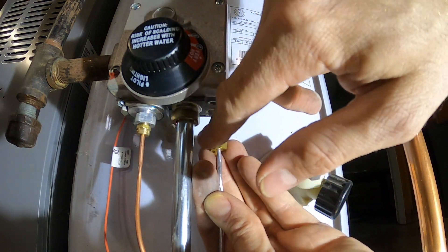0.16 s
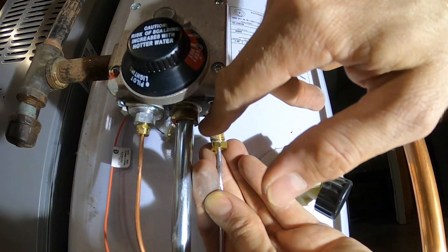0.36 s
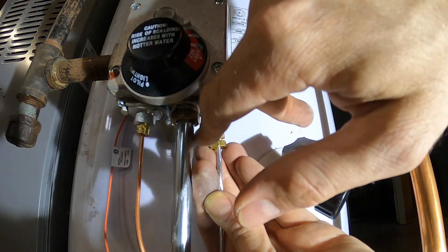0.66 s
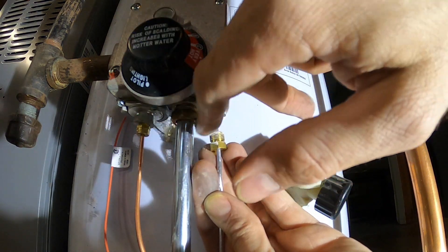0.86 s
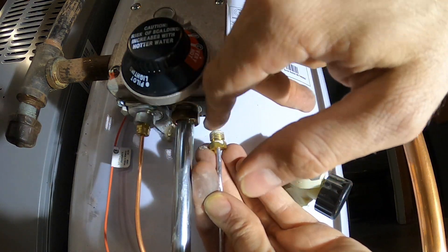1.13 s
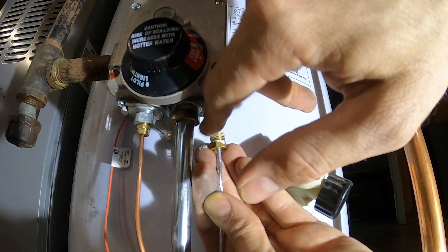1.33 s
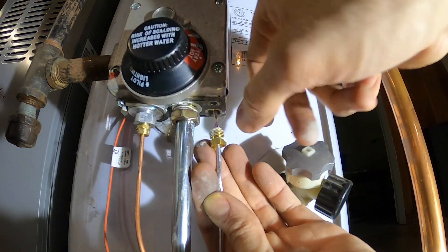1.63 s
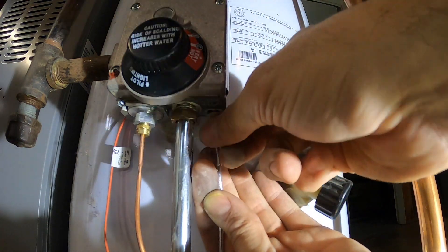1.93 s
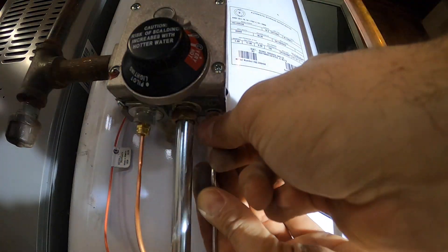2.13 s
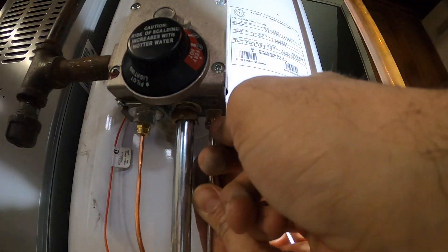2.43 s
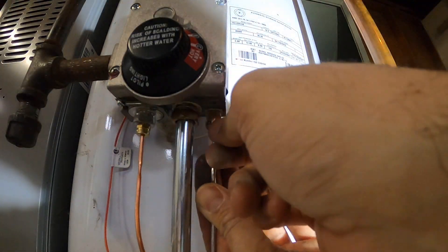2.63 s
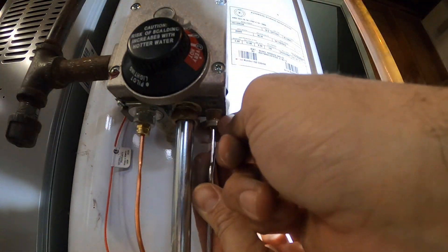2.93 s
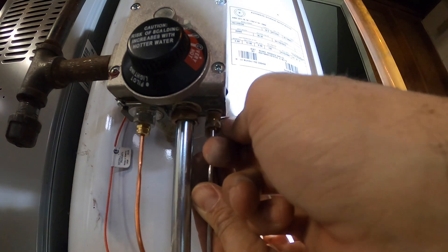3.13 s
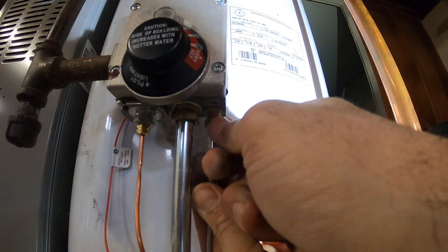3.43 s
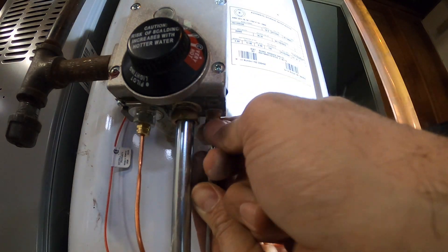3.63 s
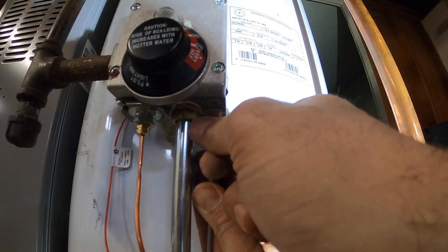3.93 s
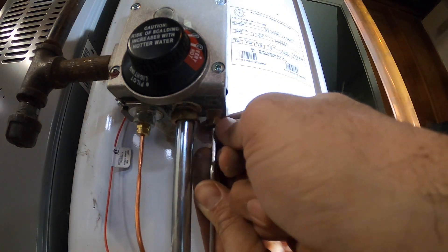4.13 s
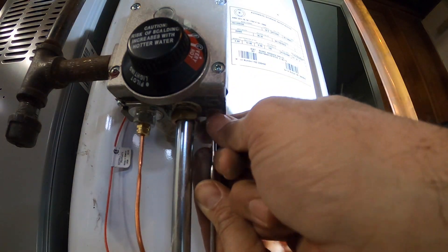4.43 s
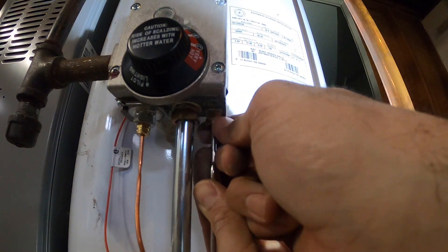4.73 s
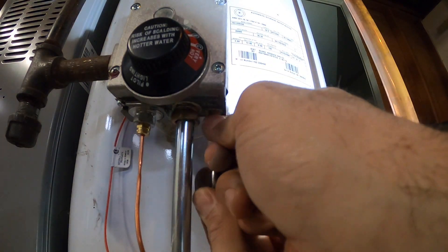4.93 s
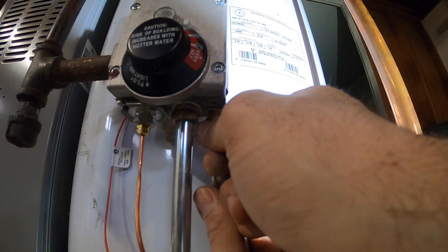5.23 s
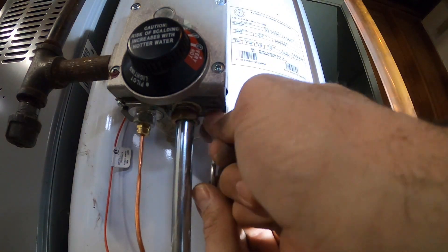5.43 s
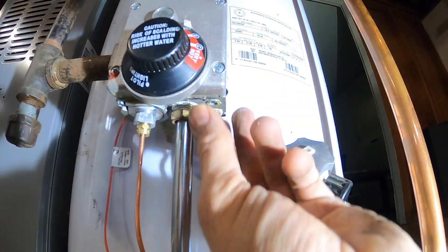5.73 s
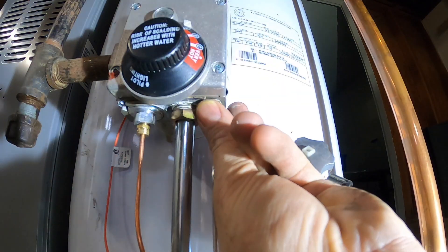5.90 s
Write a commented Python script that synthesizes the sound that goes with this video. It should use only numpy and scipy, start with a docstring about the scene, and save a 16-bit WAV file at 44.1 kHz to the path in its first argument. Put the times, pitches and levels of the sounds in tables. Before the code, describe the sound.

Close, quiet indoor handling: metal clicks and faint scratchy turns on a valve, soft tank thuds underneath, ending with a sharp bright clack.

```python
"""Low thumps and bright ticks: fingers thread a brass fitting into a gas valve on a sheet-metal tank, indoors.
Thumps are noise through tank resonances, shaped by shoves; ticks are cracks and rattles ringing valve modes.
Between them skin rubs on the brass (flickering shaped noise) and the thread scratches (random catches
ringing valve modes). A quiet room and a faint narrow hiss, both filtered noise, lie underneath."""
import sys
import numpy as np
from scipy import signal
from scipy.fft import rfft, irfft
from scipy.io import wavfile
from scipy.ndimage import uniform_filter1d

SR = 44100
rng = np.random.default_rng(int(sys.argv[2]) if len(sys.argv) > 2 else 0)


def generate_wav(sig):
    """Save sig (samples, or channels by samples) to the path in sys.argv[1] as 16-bit PCM at SR."""
    pcm = np.round(np.clip(np.atleast_2d(sig).T, -1, 1) * 32767).astype(np.int16)
    wavfile.write(sys.argv[1], SR, pcm)


N = 267422


def gain_of(db):
    """Gain of a level in dB."""
    return 10 ** (np.asarray(db) / 20)


def evened(x):
    """Scaled to rms 1."""
    return x / np.sqrt(np.mean(x ** 2) + 1e-20)


def steadied(x, size):
    """Noise with its slow swells evened out; size in samples."""
    power = uniform_filter1d(uniform_filter1d(x ** 2, size), size)
    return x / np.sqrt(power + 1e-20)


def read(points, hz):
    """A table over frequency, read on a log axis."""
    f, value = np.transpose(points)
    return np.interp(np.log(hz + 1), np.log(f + 1), value)


def add(mix, s, sound):
    """Mixes a sound in at time s."""
    part = mix[:, round(s * SR):][:, :sound.shape[1]]
    part += sound[:, :part.shape[1]]


def resonate(x, hz, width_hz):
    """One resonance of peak gain 1, at least 1 Hz wide."""
    return signal.lfilter(*signal.iirpeak(hz, hz / max(width_hz, 1), SR), x)


def patches(hz, t, bins, frames):
    """Random field of rms 1, smoothed over so many frequency bins and time frames."""
    field = rng.standard_normal((len(t), len(hz))).T
    return evened(uniform_filter1d(uniform_filter1d(field, bins, 0), frames, 1))


# left-right correlation of the noise: (frequency [Hz], correlation [-1 to 1])
LIKENESS = [(60, 0.027), (180, 0.66), (550, 0.53), (1650, 0.3), (4970, 0.46), (15000, 0.58)]


def noise(field_db, size):
    """Two-channel noise shaped by a dB field over frequency (Hz) and time (s)."""
    frames, hz = 4 * N // size + 5, np.fft.rfftfreq(size, 1 / SR)[:, None]
    a, b, c, d = rng.standard_normal((frames, len(hz), 4)).T
    same = np.clip(read(LIKENESS, hz), -1, 1)
    left = a + 1j * b
    right = same * left + np.sqrt(1 - same ** 2) * (c + 1j * d)
    spectrum = np.array([left, right]) * gain_of(field_db(hz, np.arange(frames) * size / 4 / SR))
    return signal.istft(spectrum, nperseg=size, noverlap=3 * size // 4)[1][:, :N]


def flat_noise_rms(size):
    """Rms of noise() when its field is flat at 0 dB."""
    return np.sqrt(size / 3)


# room spectrum: (frequency [Hz], relative density [dB])
ROOM_SPECTRUM = [(25, -14), (200, -17), (320, -5), (714, -16), (1130, -26), (3430, -27), (3920, -22),
                 (4610, -35), (12500, -39), (16000, -44)]
ROOM_DB = -62
HISS_HZ, HISS_WIDTH_HZ, HISS_DB = 3830, 180, -94


def room():
    """Still air as shaped noise with slow patches, and a narrow steady hiss from one resonance."""
    def field_db(hz, t):
        return read(ROOM_SPECTRUM, hz) + 1.8 * patches(hz, t, bins=10, frames=12)
    air = noise(field_db, size=1024)
    hiss = resonate(rng.standard_normal((2, N)), HISS_HZ, HISS_WIDTH_HZ)
    return gain_of(ROOM_DB) * evened(air) + gain_of(HISS_DB) * evened(hiss)


# strokes of skin on brass: (time [s], length [s], level [dB], brightness [0-1])
STROKES = [(0.216, 0.076, -69.5, 0.1), (0.38, 0.019, -76, 0.5), (0.529, 0.034, -70.5, 0.5),
           (1.609, 0.19, -64, 0.98), (1.753, 0.024, -57, 1), (1.769, 0.081, -59, 0), (1.848, 0.051, -54, 0),
           (1.9, 0.13, -62, 0), (2.031, 0.19, -59.5, 0.37), (2.347, 0.31, -63, 0.64),
           (2.996, 0.26, -62, 0.54), (3.194, 0.14, -53.5, 0.72), (3.487, 0.06, -54, 0.8),
           (3.545, 0.095, -53.5, 0.63), (3.739, 0.094, -58, 0.9), (3.944, 0.19, -63, 0.78),
           (4.111, 0.061, -59, 0.9), (4.283, 0.11, -66.5, 0), (4.356, 0.17, -58.5, 0.82),
           (4.526, 0.087, -65, 0), (4.579, 0.11, -53, 0.84), (4.679, 0.11, -56.5, 0.8),
           (4.835, 0.095, -59.5, 0.44), (4.914, 0.085, -55.5, 0.23), (5.012, 0.13, -59, 0.23),
           (5.053, 0.062, -56, 0.9), (5.153, 0.066, -53, 1), (5.315, 0.11, -59.5, 0.8),
           (5.426, 0.24, -62, 0.35), (5.592, 0.18, -54, 0.72), (5.705, 0.24, -48, 0.36),
           (5.875, 0.25, -58, 0.68)]
# fingertips rest on the brass from here on: (time [s], level [dB])
RESTING_TOUCH = (2, -72.5)


def strokes(t):
    """Power of the rubbing over time, and the bright part of it."""
    touch_s, touch_db = RESTING_TOUCH
    power = gain_of(touch_db) ** 2 * (t > touch_s) + 1e-12
    shine = 0.51 * power
    for s, length_s, db, bright in STROKES:
        u = (t - s) / length_s
        # speeds up, slides, and trails off as the skin relaxes
        slope_db = -82 * np.maximum(.2 - u, 0) - 36 * np.maximum(u - .7, 0)
        stroke = gain_of(db + slope_db) ** 2
        power = power + stroke
        shine = shine + np.clip(bright, 0, 1) * stroke
    return power, shine


# spectrum of a dull stroke: (frequency [Hz], relative density [dB])
DULL_SPECTRUM = [(600, -30), (1050, -9), (1550, -13), (2200, -1), (4000, -4), (8600, -10), (13400, -15),
                 (16000, -26)]
# spectrum of a bright stroke: (frequency [Hz], relative density [dB])
BRIGHT_SPECTRUM = [(600, -35), (1500, -15), (2100, -3), (3200, -6), (7200, -1), (10000, -5), (13400, -10),
                   (16000, -24)]


def rubbing():
    """Skin ridges slip over the brass: strokes of fine flickering hiss, between dull and bright."""
    def field_db(hz, t):
        power, shine = strokes(t)
        bright = shine / power
        colour_db = (1 - bright) * read(DULL_SPECTRUM, hz) + bright * read(BRIGHT_SPECTRUM, hz)
        colour_power = gain_of(colour_db) ** 2
        flicker = evened(uniform_filter1d(rng.standard_normal(len(t)), 3))
        level_db = 10 * np.log10(power * colour_power / colour_power.mean(0))
        return level_db + 1.4 * flicker + 2.56 * patches(hz, t, bins=16, frames=40)
    return noise(field_db, size=256) / flat_noise_rms(size=256)


# valve modes, also rung by tick(): (frequency [Hz], relative level [dB], free t60 [s])
VALVE_MODES = [(1052, 8, .2), (1094, 11, .2), (1200, 6, .15), (1290, 4, .14), (1420, 2, .11),
               (1870, 4, .12), (1940, 8, .15), (2015, 9, .13), (2100, 5, .12), (2310, 7, .09),
               (2750, 10, .1), (3480, 7, .08), (3840, 9, .08), (4830, 5, .07)]
CATCHES_PER_S, CATCH_SPREAD_DB = 1000, 3.5
SCRATCH_DB = -2  # relative to the dull part of the rubbing
SCRATCH_HZ, SCRATCH_DB_PER_OCTAVE = 2700, -11  # modes weaken away from this pitch


def scratching():
    """The thread catches at random as the fitting turns; each catch rings a finger-damped valve mode."""
    coarse = np.arange(0, N, 64)
    power, shine = (np.interp(np.arange(N), coarse, p) for p in strokes(coarse / SR))
    strength = gain_of(CATCH_SPREAD_DB * np.minimum(rng.exponential(1, N), 4))
    catches = strength * (rng.random(N) < CATCHES_PER_S / SR)
    mode = rng.integers(0, len(VALVE_MODES), N)
    rings = np.zeros(N)
    for k, (f, db, t60_s) in enumerate(VALVE_MODES):
        gain = gain_of(db + SCRATCH_DB_PER_OCTAVE * abs(np.log2(f / SCRATCH_HZ))) * np.sqrt(t60_s)
        rings += gain * resonate(catches * (mode == k), f, 22 / t60_s)  # a tenth of the free t60
    return gain_of(SCRATCH_DB) * evened(rings) * np.sqrt(abs(power - shine))


# crack spectrum: (frequency [Hz], relative level [dB])
CRACK_SPECTRUM = [(900, -22), (1800, -11), (3500, -8), (5500, -6), (8000, 0), (11000, -2), (13500, -8),
                  (16000, -20)]
BLOW_S, RATTLE_DB, RATTLE_LUMPS_DB = .003, -5, 2  # blow time constant; weaker uneven rattle
GRIP_T60_S, GRIP_PER_RATTLE = .025, 6.5  # a held fitting rings at most this plus so many rattle lengths
SPLIT, SPLIT_DB = .011, 2.5  # spread of a mode cluster: fraction of its pitch, level
BLUR_DB = -9  # modes too dense to tell apart sound as one band
KNOCK_DB, KNOCK_S = -6.5, 0.023  # tank peak relative to the valve ring, at this rattle length
KNOCK_WIDTH_HZ = 1.74 / 0.41


def tick(tick_db, ring_db, ring_hz, rattle_s, chance):
    """A crack, then a blow and dying rattle that ring valve modes near one pitch and knock the tank."""
    t = np.arange(SR // 4) / SR
    hz = np.fft.rfftfreq(len(t), 1 / SR)
    grit = chance.standard_normal((3, len(t)))
    grit = grit[0] + 0.33 * grit[1:]  # two channels, mostly alike

    crack = irfft(rfft(grit) * gain_of(read(CRACK_SPECTRUM, hz)), len(t))
    crack = crack * (gain_of(-60 * t / 0.003) + gain_of(-22 - 60 * t / 0.04))

    lumps_db = RATTLE_LUMPS_DB * evened(uniform_filter1d(chance.standard_normal(len(t)), size=90))
    tail = gain_of(RATTLE_DB + lumps_db) * np.exp(-t / max(rattle_s, .001))
    rattle = grit * (np.exp(-t / BLOW_S) + tail)

    band = resonate(resonate(rattle, ring_hz, .9 * ring_hz), ring_hz, .9 * ring_hz)
    ring = gain_of(BLUR_DB) * band
    for f, db, t60_s in VALVE_MODES:
        held_t60_s = min(t60_s, GRIP_T60_S + GRIP_PER_RATTLE * rattle_s)
        for split, luck in chance.standard_normal((3, 2)):
            gain = gain_of(db + SPLIT_DB * luck) * np.sqrt(held_t60_s)
            ring = ring + gain * resonate(band, f * (1 + SPLIT * split), 2.2 / held_t60_s)

    tank_modes = WALL_MODES[1:] + SHELL_MODES[:-1]
    knock = sum(gain_of(db) * resonate(rattle[0], f, KNOCK_WIDTH_HZ) for f, _, db in tank_modes)
    knock = gain_of(KNOCK_DB) * rattle_s / KNOCK_S * knock / abs(knock).max()
    knock = knock * np.cos(2 * np.pi * t) ** 2  # fades to nothing at 0.25 s
    return gain_of(tick_db) * crack / abs(crack).max() + gain_of(ring_db) * (ring / abs(ring).max() + knock)


# metal on metal, levels before the left-right tilt:
# (time [s], crack level [dB], ring level [dB], ring centre [Hz], rattle time constant [s])
CONTACTS = [(.0692, -45, -74, 1690, 0.008), (0.141, -66, -45, 3680, 0.0048), (0.229, -50, -50, 3850, 0.014),
            (0.819, -31.5, -55.5, 2330, 0.18), (1.086, -45.5, -57, 3030, 0.003),
            (1.1524, -51, -48.5, 3470, 0.004), (1.272, -74, -52, 3180, 0.023),
            (1.378, -67, -52.5, 2170, 0.022), (1.7958, -37, -34, 2320, 0.0021),
            (1.813, -55, -42, 2060, 0.002), (1.8866, -43, -31.5, 2730, 0.017),
            (2.101, -58, -45.5, 3430, 0.0073), (2.2, -52, -46, 2820, 0.022),
            (2.377, -60, -47.5, 3600, 0.0062), (2.66, -21, -36, 3800, 0.016),
            (2.668, -62, -29.5, 1510, 0.029), (2.8, -55, -43.5, 1540, 0.02), (2.811, -78, -44, 3430, 0.018),
            (2.8845, -32.5, -43, 2450, 0.00094), (2.89, -70, -42.5, 1450, 0.031),
            (3.034, -40, -40.5, 3000, 0.017), (3.351, -36, -36.5, 3460, 0.017),
            (3.409, -48, -45.5, 2660, 0.019), (3.565, -23.5, -35, 2180, 0.015),
            (3.726, -39.5, -53, 4200, 0.0056), (3.7966, -58, -33, 2350, 0.0029),
            (4.309, -40, -56, 3450, 0.011), (4.93, -32, -40.5, 3300, 0.022), (5.301, -43, -48, 3800, 0.003),
            (5.309, -70, -45.5, 1370, 0.051), (5.443, -55, -47.5, 3900, 0.0062),
            (5.6272, -31.5, -37.5, 1450, 0.046), (5.741, -33, -39, 1350, 0.0087),
            (5.773, -44, -23, 3470, 0.002), (5.7813, -14.5, -23, 4270, 0.012),
            (5.7842, -60, -23.5, 1600, 0.04), (5.959, -35, -42.5, 4030, 0.0039)]


def ticks():
    """The fitting strikes the valve; each contact is tilted slightly louder to the left."""
    out = np.zeros((2, N))
    for (s, *row), chance in zip(CONTACTS, rng.spawn(len(CONTACTS))):
        add(out, s, tick(*row, chance) * gain_of([[.5], [-.5]]))
    return out


# shoves on the tank, levels before the left-right tilt:
# (time [s], hold [s], deep sway [dB], wall drumming [dB], shell rattle [dB])
TANK_SHOVES = [(0.236, 0.033, -57, -60, -52), (0.543, 0.049, -51, -49, -41.5),
               (0.862, 0.033, -44, -40.5, -38.5), (1.148, 0.089, -58, -41, -46.5),
               (1.258, 0.12, -79, -44, -56.5), (1.79, 0.02, -56, -55.5, -74),
               (2.04, 0.084, -58, -41.5, -44.5), (2.141, 0.016, -20.5, -23.5, -39.5),
               (2.364, 0.0073, -57, -26.5, -43.5), (2.397, 0.068, -31.5, -34, -45),
               (2.554, 0.055, -47, -41.5, -46.5), (2.65, 0.1, -72, -47, -46.5),
               (3.098, 0.13, -43, -54.5, -52), (3.234, 0.013, -17, -14, -22.5),
               (3.487, 0.035, -16.5, -18.5, -26.5), (3.719, 0.03, -24.5, -20, -30.5),
               (3.952, 0.016, -27.5, -74.5, -49), (3.977, 0.079, -33, -32.5, -45),
               (4.277, 0.24, -52, -59, -50.5), (4.385, 0.033, -30, -44, -50.5),
               (4.609, 0.082, -46, -53.5, -52.5), (4.726, 0.078, -56, -59, -51),
               (4.841, 0.073, -36.5, -52, -47), (4.952, 0.015, -49, -43, -45.5),
               (5.302, 0.071, -35, -51, -50.5), (5.621, 0.039, -25, -41, -45.5),
               (5.77, 0.09, -62, -43, -37.5), (5.918, 0.067, -34, -34, -42.5)]
# whole tank rocking: (frequency [Hz], nominal width [Hz], relative level [dB])
SWAY_MODES = [(48.8, 24.3, -5.5), (62.7, 16, 1.5), (80, 20, -22)]
# tank wall, also knocked by tick(): (frequency [Hz], nominal width [Hz], relative level [dB])
WALL_MODES = [(101, 24, -2), (143, 17, 0), (176, 19, 1), (215, 38.5, -3.5)]
# outer shell, also knocked by tick(): (frequency [Hz], nominal width [Hz], relative level [dB])
SHELL_MODES = [(254.7, 49, 1), (336, 57, 1), (404.2, 13, -4.5), (441.8, 10.3, -1.5), (503.6, 41, -7),
               (595, 32, -11), (695, 46, -10.5), (767, 376, -13.5)]
# the tank never rests quite still: (sway [dB], drumming [dB], rattle [dB])
RESTLESS_DB = (-74, -64, -64.5)
# dying away after a shove: (sway t60 [s], drumming t60 [s], rattle t60 [s])
DECAY_T60_S = (0.39, 0.51, 0.6)
LET_GO_S, LET_GO_DB = 0.041, -4.5  # quick drop when the hand lets go, then the tank rings out


def tank():
    """Each shove holds, then dies away in three groups of tank resonances, slightly louder on the left."""
    t, out = np.arange(N) / SR, np.zeros(N)
    power = gain_of(RESTLESS_DB)[:, None] ** 2 * np.ones(N)
    for s, hold_s, *db in TANK_SHOVES:
        after_s = np.maximum(t - s - hold_s, 0)
        drop_db = LET_GO_DB * (1 - np.exp(-after_s / LET_GO_S))
        decay_db = drop_db - 60 * after_s / np.array(DECAY_T60_S)[:, None]
        power += (gain_of(db)[:, None] * (t >= s) * gain_of(decay_db)) ** 2

    groups = (SWAY_MODES, WALL_MODES, SHELL_MODES)
    rises_s, lumps_s, lows_hz = (.03, .014, .006), (.055, .035, .02), (34, 75, 190)
    for modes, force, rise_s, lump_s, low_hz in zip(groups, power, rises_s, lumps_s, lows_hz):
        push = rng.standard_normal(N)
        body = np.zeros(N)
        for k, (f, w, db) in enumerate(modes):
            # applied twice, so the valleys beside each group stay dark
            mode = resonate(resonate(push, f, 1.88 * w), f, 1.88 * w)
            body += (-1) ** k * gain_of(db) / np.sqrt(w) * mode
        envelope = uniform_filter1d(np.sqrt(force), round(rise_s * SR))  # bass builds slower
        shaken = steadied(body, round(lump_s * SR)) * envelope
        # little radiates below the lowest mode
        out += signal.sosfilt(signal.butter(4, low_hz, "high", fs=SR, output="sos"), shaken)
    return out * gain_of([[.4], [-.4]])


def scene():
    """Tank, rubbing, scratches, room and ticks."""
    return tank() + rubbing() + scratching() + room() + ticks()


EDGE_HZ = 16200


def record(dry):
    """Left port hears a sample late; the microphone drops the deepest bass; then the band limit."""
    ports = np.array([np.roll(dry[0], shift=1), dry[1]])
    ports = signal.lfilter(*signal.butter(1, 40, "high", fs=SR), ports)
    low_pass = signal.firwin(511, EDGE_HZ, window=("kaiser", 9), fs=SR)
    return signal.oaconvolve(ports, low_pass[None], "same")


dry = scene()
out = record(dry)
generate_wav(out)
```